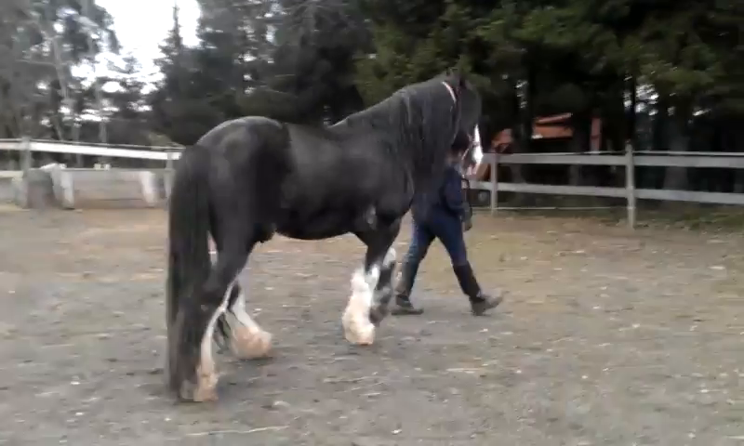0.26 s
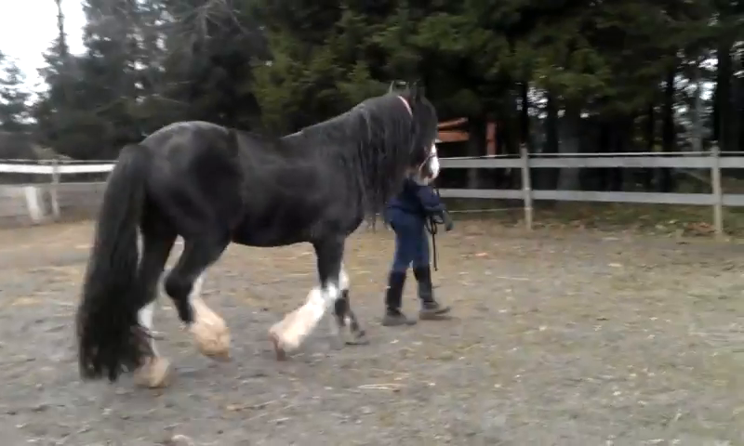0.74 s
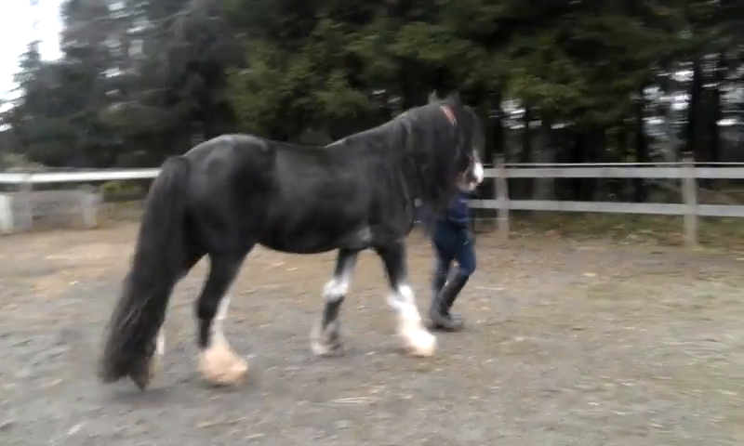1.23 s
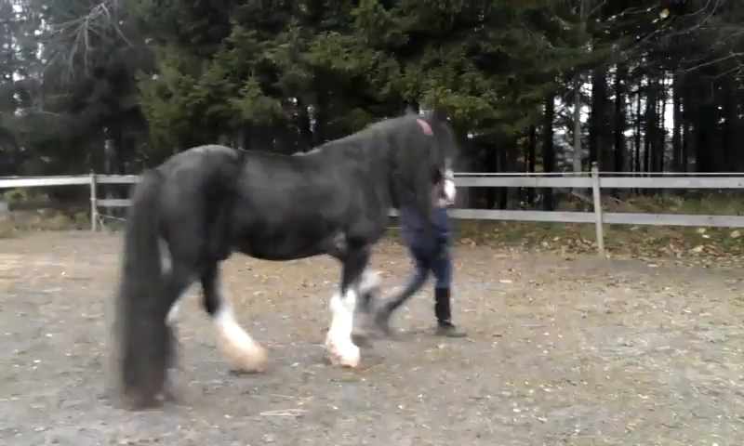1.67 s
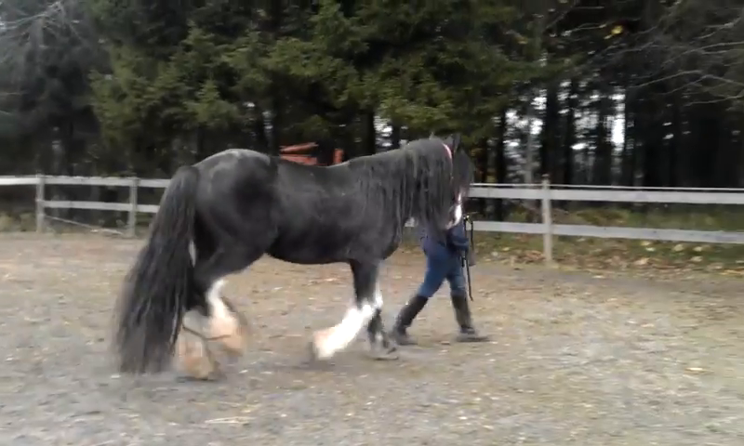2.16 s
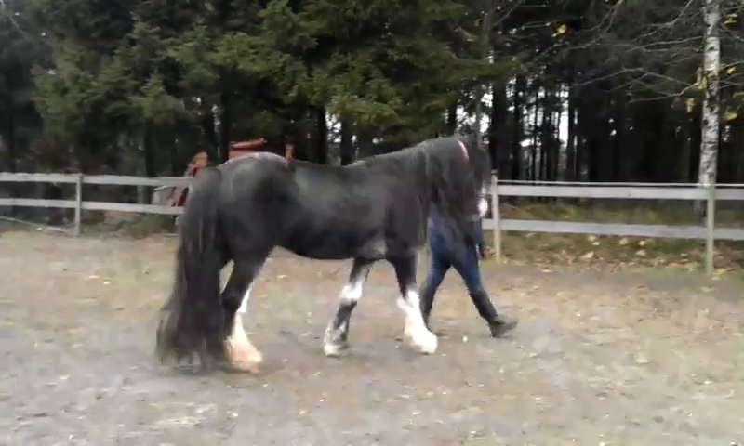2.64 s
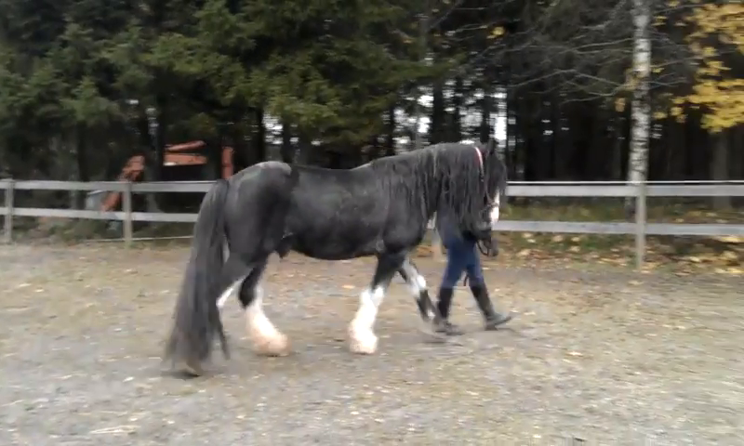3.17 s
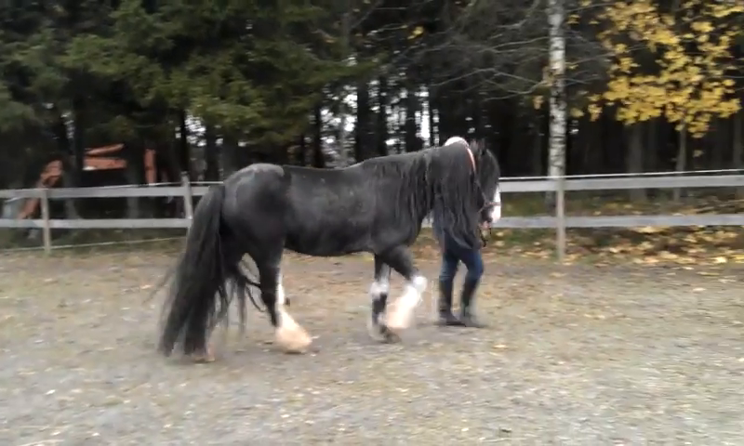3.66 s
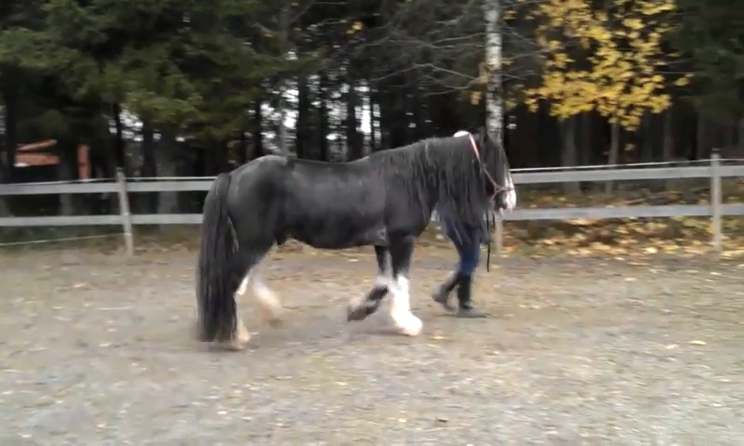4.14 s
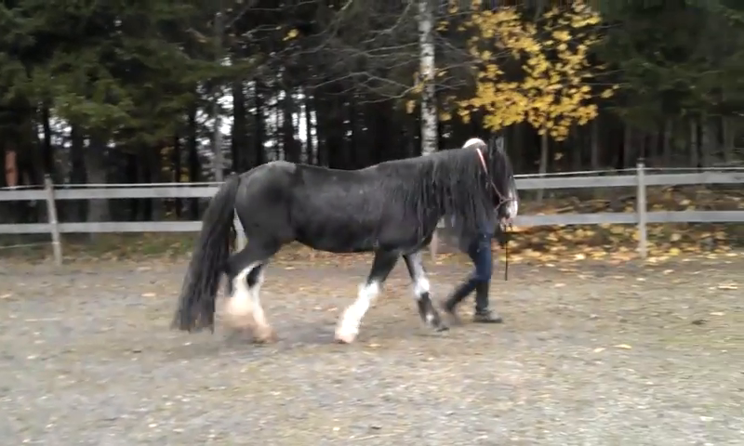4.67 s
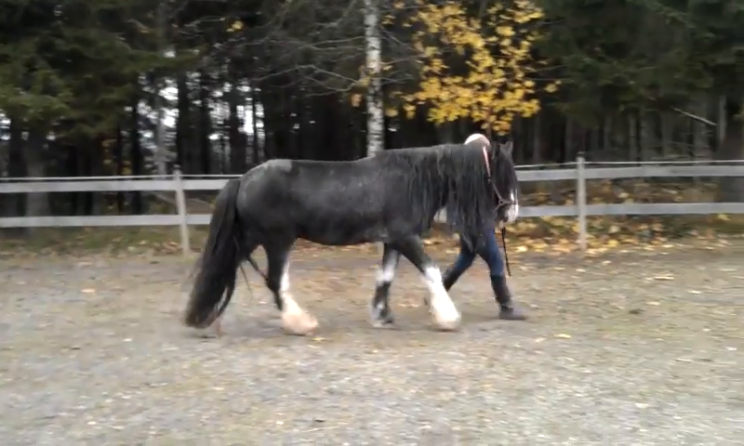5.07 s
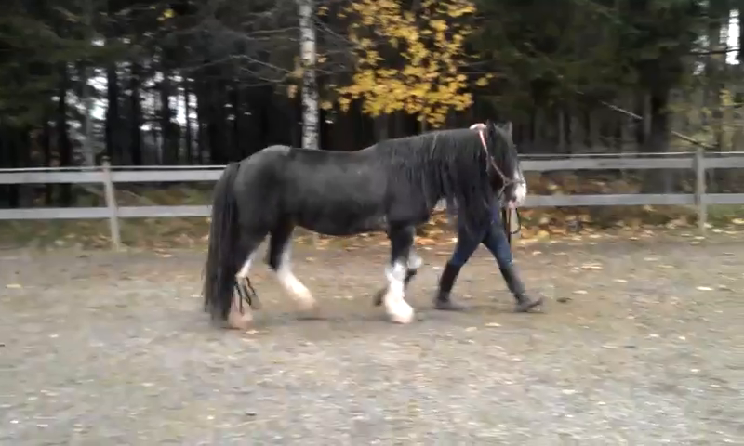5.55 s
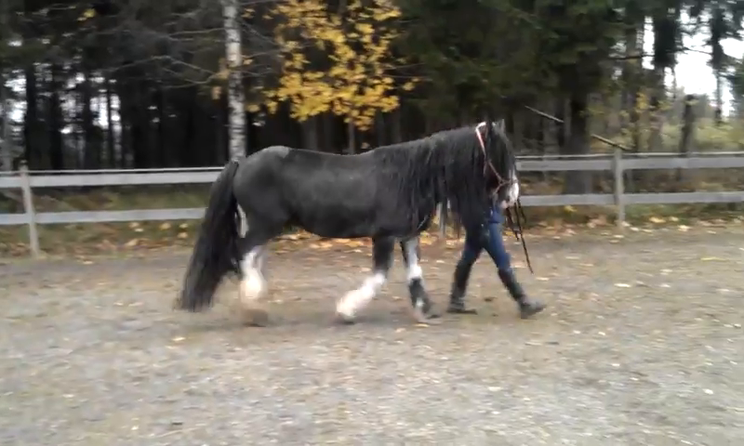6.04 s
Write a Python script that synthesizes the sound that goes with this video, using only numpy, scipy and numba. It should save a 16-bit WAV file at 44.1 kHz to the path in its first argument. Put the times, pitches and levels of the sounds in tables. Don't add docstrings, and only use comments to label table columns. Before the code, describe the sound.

A heavy horse is led over gravel, some metres from a small camera microphone. It opens with dense scraping and coarse pebbles clacking, then uneven hoof and boot crunches with dragging grit between them. The later steps are more separate, with sandy grinding and small stone ticks. Faint air and distant traffic hiss stay underneath, with barely any echo from the trees.

```python
import sys
import numpy as np
from scipy import signal
from scipy.fft import rfft, irfft
from scipy.io import wavfile
from scipy.ndimage import uniform_filter1d
from numba import njit

SR = 44100
rng = np.random.default_rng(int(sys.argv[2]) if len(sys.argv) > 2 else 0)


def gain_from_db(level_db):
    decades = np.asarray(level_db, float) / 20
    return 10 ** decades


def digitize_waveform(pressure):
    field = np.atleast_2d(pressure).T
    bounded = np.clip(field, -1, 1)
    quanta = np.round(bounded * 32767).astype(np.int16)
    wavfile.write(sys.argv[1], SR, quanta)


N = 277866


# frequency in Hz, gain in dB.
GRAVEL = [(59, -128), (100, -66), (224, -35), (950, -17), (1580, -7), (2630, -3), (2930, -6.5), (4770, 0),
          (5770, -1), (6840, -16.5), (8830, -12), (10000, -19.5), (12700, -23.5), (14400, -29.5),
          (16000, -13.5)]


def crunch():
    clicks_per_s, hardest = 8000, 4.0
    packed_db, loose_db, own_db = 0.5, 3.0, 0.7
    sandy_db, blend_db = -8.5, 14.5
    sizes = [(246, 1086, 2, -1.5),
             (905, 2000, 4.3, 3.7),
             (1866, 3526, 6.9, 2.55),
             (3830, 6700, 6.2, 1.45),
             (7610, 11370, 23, 14.02),
             (11640, 14400, 18, 20.5)]
    count = clicks_per_s * N // SR
    start = rng.uniform(0, N - 1, count)
    shared = np.minimum(rng.exponential(1, count), hardest)
    force = pressure()

    sand_over_grit = 20 * np.log10(force[4] / force[3])[start.astype(int)]
    packed = np.clip(0.5 + (sand_over_grit - sandy_db) / blend_db, 0, 1)
    scatter_db = np.clip(loose_db + (packed_db - loose_db) * packed, 0, 4.2)

    thin = 0.5 - scatter_db * np.log(10) / 10
    mean_power = (1 - np.exp(-thin * hardest)) / thin + np.exp(-thin * hardest)
    blow = gain_from_db(scatter_db * shared) / np.sqrt(mean_power)

    out = 0
    for (lo_hz, hi_hz, cycles, db), push in zip(sizes, force):
        hz = lo_hz + (hi_hz - lo_hz) * rng.random(count)
        own = gain_from_db(own_db * rng.exponential(1, count))
        size = blow * own * np.sqrt(hz) * rng.choice([-1, 1], count)
        ring = cycles * rng.uniform(0.94, 1.94, count)
        swarm = grains(N, start, hz, ring, size, 1.0 * SR)
        out = out + gain_from_db(db) * push * unit(swarm)
    return colour(out, GRAVEL)


def pressure():
    chip_share, dust_share = 0.6, 2.01
    t = np.arange(0, N + 32, 32) / SR
    power = 1e-18
    presses = footfalls() + drags() + brushes() + slides() + taps() + scrapes() + ploughs()
    for s, db, rise_ms, fall_ms, pebble_db, sand_db, stones_db, chips_db in presses:
        away = np.abs(t - s) * 1000 / np.where(t < s, max(rise_ms, 2), max(fall_ms, 2))
        sizes_db = np.array([pebble_db + stones_db, pebble_db, chip_share * pebble_db + chips_db,
                             0, sand_db, dust_share * sand_db])
        shape_db = -10 * np.minimum(away, 8) ** 1.5
        power = power + gain_from_db(db + sizes_db[:, None] + shape_db) ** 2
    return [np.interp(np.arange(N) / SR, t, np.sqrt(p)) for p in power]


# touch in seconds, touch level in dB,
# ms until full weight, weight level in dB, pebbles minus grit in dB.
HOOVES = [
    (1.227, -28.5, 18, -25.5, -1.5),
    (3.909, -32.5, 19.5, -27, -2),
    (4.34, -34.5, 38.8, -24.5, -5),
    (5.027, -32.5, 23.7, -23.5, -5.5),
    (5.681, -27, 31.3, -25, -3.5),
]
# (seconds, dB, ms, dB, dB).
SANDY_HOOVES = [
    (3.057, -28, 38.4, -21.5, -10),
    (3.692, -35, 23, -23.5, -6.5),
]
# (seconds, dB, ms, dB, dB).
BOOTS = [
    (0.2, -25.5, 31, -22.5, -4.5),
    (0.959, -29, 15.8, -21.5, -6.5),
    (1.735, -26, 46.3, -22, -7),
    (1.996, -44, 8.2, -27.5, -4.5),
    (2.398, -27, 20.3, -22, -2),
    (2.622, -31.5, 18.7, -32.5, -3),
    (3.335, -37, 14, -30.5, -4),
    (5.212, -33, 17, -24, -7.5),
    (5.924, -40.5, 13.4, -29.5, -5.5),
]


def footfalls():
    touch_fall_ms, touch_pebble_db, weight_rise_share = 23.5, -3, 0.49
    # feet, touch rise in ms, weight fall in ms, (sand, big stones, chips) in dB
    kinds = [(HOOVES, 4.5, 24.4, (-8, 0.1, -2.1)),
             (SANDY_HOOVES, 4.5, 24.4, (-7, 0.1, -1.3)),
             (BOOTS, 3.2, 14, (-7, 5.1, -2.1))]
    rows = []
    for feet, rise_ms, fall_ms, mix in kinds:
        for s, touch_db, lag_ms, db, pebble_db in feet:
            rows.append((s, touch_db, rise_ms, touch_fall_ms, pebble_db + touch_pebble_db, *mix))
            rows.append((s + lag_ms / 1000, db, weight_rise_share * lag_ms, fall_ms, pebble_db, *mix))
    return rows


# peak in seconds, grit level in dB, rise in ms,
# fall in ms, pebbles minus grit in dB.
DRAGS = [(0.394, -28, 8.3, 6, -10), (5.066, -36, 8, 46, -5), (0.56, -33, 30, 43, -2),
         (1.29, -49.5, 12, 20, -5.5), (0.119, -28.5, 30, 36, -16), (0.404, -23.5, 8, 16, -5.5),
         (0.447, -35.5, 68, 8, -4.5), (0.739, -31, 60, 98, -6.5), (1.022, -31.5, 76, 4.1, -6),
         (1.078, -27, 73, 34.5, -14), (1.395, -35.5, 72, 24, -5.5), (1.438, -32.5, 27, 43, -10.5),
         (1.599, -29.5, 20, 87, -9.5), (1.668, -30.5, 14, 35, -10), (3.226, -36.5, 22, 73, -13),
         (3.422, -33.5, 45, 63, -6), (3.49, -28, 53, 14, -13), (3.825, -42, 49, 23, -11.5),
         (4.037, -32, 113, 38, -9), (4.451, -40.5, 27, 19, -6.5), (4.509, -35, 23, 51, -13.5),
         (4.578, -36, 19, 62, -6), (4.757, -34, 16, 28.5, -15.5), (4.973, -45, 47, 14, -4),
         (6.235, -28, 48.5, 23, -9.5), (6.278, -28, 27, 26, -9), (1.725, -25, 16, 17, -32),
         (1.983, -33, 13, 42, -14)]


def drags():
    return [(*row, -13, 3.4, 0.1) for row in DRAGS]


# peak in seconds, grit level in dB, rise in ms, fall in ms.
BRUSHES = [(0.293, -42, 39, 20), (0.508, -25.5, 85, 155), (0.645, -31, 12, 37), (0.772, -25, 29, 10),
           (1.561, -28.5, 12.5, 18), (2.296, -31, 79, 18.4), (2.782, -34, 18, 140), (2.837, -34, 64, 4.7),
           (2.89, -35, 15, 17), (3.285, -40, 20, 12), (3.99, -30, 11, 3.5), (4.631, -27.5, 21, 16),
           (5.095, -34.5, 4.6, 94), (5.651, -33.5, 30, 8), (6.197, -37, 7, 6)]


def brushes():
    pebble_db = -19.5
    return [(*row, pebble_db, -13, 6, -1.1) for row in BRUSHES]


# peak in seconds, grit level in dB, half length in ms.
SLIDES = [
    (0.004, -27.5, 14),
    (1.848, -40, 13),
    (1.921, -45.5, 54),
    (2.149, -27, 36),
    (2.573, -47, 33),
    (2.618, -35.5, 11.6),
    (3.6, -53.5, 84),
    (5.45, -58.5, 160),
    (5.574, -38.5, 22),
    (6.068, -35.5, 31.5),
]


def slides():
    pebble_db = -10.5
    return [(s, db, half_ms, half_ms, pebble_db, -8.5, 0.1, -1.8) for s, db, half_ms in SLIDES]


# start in seconds, grit level in dB, fall in ms, pebbles minus grit in dB.
TAPS = [(2.935, -51, 11, -15), (2.568, -45.5, 11, -16), (5.425, -54.5, 14, -9), (3.78, -45, 12, -8),
        (6.22, -30, 11, -6), (0.15, -39.5, 57, 0.5), (0.364, -27.5, 13, -12), (1.136, -41.5, 89, -9),
        (1.313, -50, 10, 3), (1.465, -46.5, 66, -1.5), (2.229, -41.5, 34, 2), (2.756, -36, 66, -17),
        (3.159, -46, 63, -7), (4.103, -48.5, 52, -8), (4.209, -47, 11, 1.5), (4.546, -34, 16, 5.5),
        (4.694, -50, 37, -5), (4.921, -50, 69, 4.5), (5.364, -51, 35, -21), (5.83, -44.5, 31, -17)]


def taps():
    rise_ms = 2.7
    return [(s, db, rise_ms, fall_ms, pebble_db, -10, 3, -0.14) for s, db, fall_ms, pebble_db in TAPS]


# peak in seconds, grit level in dB, rise in ms, fall in ms,
# pebbles minus grit in dB.
SCRAPES = [
    (0.002, -26.5, 16, 39, 2),
    (0.039, -25.5, 28, 62, 3.5),
    (0.218, -25.5, 11, 25.3, 2),
    (0.622, -43, 18, 31.6, 21),
    (0.718, -46, 3.5, 28, 10),
    (1.254, -24, 2.9, 6.9, 4),
    (1.271, -31.5, 32, 32, 0.5),
    (5.677, -30, 27, 16, -1),
]


def scrapes():
    return [(*row, -17, -25, 3.7) for row in SCRAPES]


# peak in seconds, grit level in dB, rise in ms, fall in ms,
# pebbles minus grit in dB.
PLOUGHS = [
    (0.501, -35, 8.6, 13, 10.5),
    (0.542, -32.5, 23, 49, 10.5),
    (0.587, -41, 5.7, 110, -7),
]


def ploughs():
    return [(*row, -12.5, 7.1, 1) for row in PLOUGHS]


# start in seconds, peak in dB.
CRACKS = [(0.0403, -10), (0.151, -6.5), (0.1995, -14), (0.476, -8), (0.5236, -17), (0.8099, -17),
          (0.9762, -11), (0.9841, -6), (1.0451, -14), (1.4692, -19), (1.56, -16), (1.574, -17),
          (1.6688, -17), (1.7166, -8.5), (1.7353, -15), (2.4151, -10), (3.4022, -20), (3.467, -13),
          (3.4999, -21), (3.7105, -13), (4.5484, -19), (4.6306, -15), (5.048, -17), (5.2278, -20),
          (5.6475, -14.5), (5.665, -19), (6.2205, -10), (6.279, -18)]
# start in seconds, peak in dB, ring in Hz.
CLACKS = [(0.0157, -9, 3080), (0.0475, -7, 1730), (0.039, -6, 1650), (0.0745, -11, 2740),
          (0.1197, -20, 2880), (0.1338, -15.5, 2720), (0.3563, -16, 2510), (0.3642, -14, 2700),
          (0.4991, -7, 2500), (0.519, -7, 2980), (0.7245, -10, 1550), (0.634, -15, 1500), (1.255, -9, 2250),
          (1.4305, -16.5, 3500), (1.4378, -16, 2900), (3.4279, -19.5, 1620), (4.2087, -33, 1150),
          (4.5531, -18.5, 1370), (4.6952, -39, 1380), (4.9286, -23.5, 2280), (5.2861, -36, 1640),
          (5.622, -26, 2220), (5.6776, -9, 1750)]
# start in seconds, peak in dB, ring in Hz.
KICKED = [(0.03, -17, 1620), (0.616, -37, 1700), (1.019, -16, 5360), (1.0603, -15, 4630),
          (1.076, -19, 5260), (1.2686, -9.5, 2650), (1.3705, -20, 2260), (1.3901, -16, 4340),
          (1.611, -15, 4600), (2.7686, -20, 5090), (2.7764, -25, 5150), (2.7864, -25, 4800),
          (2.8034, -19, 5270), (2.8104, -19, 5340), (2.8364, -31, 4840), (3.226, -23, 4200),
          (3.9738, -19, 5260), (4.003, -20, 5360), (4.0192, -18, 4640), (4.0494, -36, 4480),
          (5.063, -14, 5050), (6.2354, -34, 4690), (2.7943, -16, 5140), (2.8195, -13, 5270),
          (2.8886, -14, 5300), (3.9896, -15, 5350), (5.5301, -27, 5560), (5.5648, -20, 5350),
          (5.5834, -19, 5530)]
# start in seconds, peak in dB, ring in Hz.
TICKS = [(0.0404, -7, 4650), (0.0471, -30, 1570), (0.0735, -8.5, 2710), (0.1044, -7, 4130),
         (0.1174, -12, 4860), (0.1325, -21, 2800), (0.1705, -18, 3920), (0.1886, -23, 2500),
         (0.2033, -2.5, 4040), (0.2892, -23, 4950), (0.4429, -22, 4610), (0.448, -16, 5340),
         (0.467, -16, 5170), (0.5042, -10, 3320), (0.663, -12, 4310), (0.9547, -27, 4690),
         (1.0231, -10, 5100), (1.0738, -17, 4780), (1.2254, -18, 5170), (1.317, -28, 4130),
         (1.351, -22, 2370), (1.3548, -16, 3230), (1.4103, -19, 3960), (1.5595, -21, 5470),
         (1.602, -25, 5430), (1.6254, -18, 2780), (1.6639, -21, 5300), (1.9901, -25, 5380),
         (2.239, -22, 5430), (2.287, -18, 5120), (2.3084, -20, 5810), (2.6203, -18, 5510),
         (2.7494, -33, 5510), (2.787, -30, 5040), (2.793, -27, 5000), (2.903, -27, 5080),
         (3.0573, -25, 4480), (3.2375, -18, 4390), (3.3455, -16, 5470), (3.4518, -18, 5510),
         (3.9278, -9, 5080), (3.9713, -23, 5210), (4.4497, -29, 5210), (4.5482, -25, 1630),
         (4.5595, -19, 5000), (4.57, -16, 4350), (4.6234, -21, 5470), (4.918, -25, 4400),
         (5.0749, -20, 4690), (5.1582, -26, 4820), (5.5716, -28, 4770), (5.6266, -28, 5680),
         (5.6438, -23, 5600), (5.661, -25, 2500), (5.6654, -21, 4870), (5.6877, -13, 5080),
         (5.7023, -6, 4780), (5.707, -11, 4610), (6.2739, -15, 2330), (6.29, -16, 2540)]


def cracks():
    touch_crack_db, tick_db = 8, -2.5
    crack_hz, spread_hz = 4600, 190
    landed = [(row[0], row[1] + touch_crack_db) for row in HOOVES + SANDY_HOOVES + BOOTS]
    small = np.array(CRACKS + landed)
    ring_hz = crack_hz + spread_hz * rng.uniform(-0.92, 1, len(small))
    ticks = np.add(TICKS, [0, tick_db, 0])
    stones = np.vstack([np.column_stack([small, ring_hz]), CLACKS, KICKED, ticks])
    snaps = stones * [1, 1, 0.5] + [0, 0, 2600]
    return struck(stones, 5.0, -3.0) + colour(struck(snaps, 1.9, -7.5), GRAVEL)


# start in seconds, peak in dB, ring in Hz.
KNOCKS = [(0.203, -49, 947), (0.501, -32.5, 587), (0.535, -26, 1020), (0.617, -44, 900), (0.977, -34, 850),
          (1.236, -36, 930), (1.757, -52, 710), (2.093, -35, 620), (2.226, -40, 750), (2.41, -32, 720),
          (3.427, -29, 1070), (3.718, -39.5, 730), (3.928, -33, 1040), (4.368, -34.5, 930),
          (4.549, -39, 950), (5.039, -39, 910), (5.679, -45, 900)]


def knocks():
    return struck(KNOCKS, 6.0, 1.8)


# start in seconds, peak in dB, ring in Hz.
THUMPS = [(0.204, -40.5, 192.5), (0.53, -46, 240), (0.971, -32.5, 186), (1.246, -43, 313), (1.73, -49, 297),
          (2.39, -40, 246), (3.099, -52, 255), (3.707, -44, 158), (3.919, -48, 338), (4.067, -44, 288),
          (4.362, -41, 205), (5.049, -50, 285), (5.22, -41, 261), (5.689, -50, 236), (5.94, -47, 352),
          (6.229, -60, 350)]


def thumps():
    return struck(THUMPS, 7.5, -3.9)


def struck(table, cycles, db):
    s, peak_db, hz = np.transpose(table) * 1.0
    return grains(N, s * SR, hz, np.full(len(s), cycles), gain_from_db(peak_db + db), 1.0 * SR)


@njit
def grains(count, start, hz, cycles, size, sr):
    out = np.zeros(count)
    for g in range(len(start)):
        tau = cycles[g] * sr / hz[g] / 7
        turn = np.exp(2j * np.pi * hz[g] / sr - 1 / tau)
        first = int(start[g])
        z = size[g] * np.e / tau + 0j
        for k in range(min(int(9 * tau), count - first)):
            out[first + k] += k * z.imag
            z *= turn
    return out


def colour(x, table):
    hz, db = np.transpose(table)
    grid_hz = np.linspace(1, SR / 2, 1025)
    gain_db = np.interp(np.log(grid_hz), np.log(hz), db)
    cep = irfft(np.log(gain_from_db(gain_db)))
    cep[1:1024] *= 2
    cep[1025:] = 0
    return signal.fftconvolve(x, irfft(np.exp(rfft(cep))))[:N]


def unit(x):
    return x / np.sqrt(np.mean(x ** 2))


def trees(x):
    t60_s, echo_db, build_s = 0.24, -18, 0.007
    t = np.arange(SR // 2) / SR
    tail = rng.standard_normal(len(t)) * gain_from_db(-60 * t / t60_s) * np.minimum(t / build_s, 1)
    return gain_from_db(echo_db) * signal.fftconvolve(x, tail / np.sqrt(np.sum(tail ** 2)))[:N]


# frequency in Hz, gain in dB.
AIR = [(24, -41), (40, -67), (112, -9.5), (345, -5), (444, -7.5), (516, -5.5), (751, -3), (1180, -6),
       (1410, -5), (2700, -11.5), (6650, -14.5), (7000, -41), (7350, -21.5), (14800, -24), (16000, -27)]
# time in seconds, level change in dB.
BREEZE = [
    (0, -1),
    (1, 0.7),
    (2, 3),
    (2.9, 1),
    (4.2, 3),
    (5.3, 2),
    (6.3, 2),
]


def air():
    air_db = -54.5
    swell_db = np.interp(np.arange(N) / SR, *np.transpose(BREEZE))
    level_db = air_db + swell_db + 0.35 * walk(2.54) + 0.77 * walk(11)
    return unit(colour(rng.standard_normal(N), AIR)) * gain_from_db(level_db)


def walk(rate):
    k = int(SR / rate)
    held = np.repeat(rng.standard_normal(N // k + 1), k)
    return uniform_filter1d(held, k)[:N] * 2.0


def scene():
    steps = crunch() + cracks() + knocks() + thumps()
    return (steps + trees(steps) + air())[None]


def band_limit(x):
    return signal.sosfilt(signal.butter(12, 15870, fs=SR, output="sos"), x)


def record(dry):
    rumble_cut = signal.butter(3, 251, "high", fs=SR, output="sos")
    top_cut = signal.ellip(10, 0.3, 70, 15870, fs=SR, output="sos")
    wet = signal.sosfilt(rumble_cut, dry)
    wet = signal.sosfilt(top_cut, wet)
    return band_limit(wet)


dry = scene()
out = record(dry)
digitize_waveform(out)
```